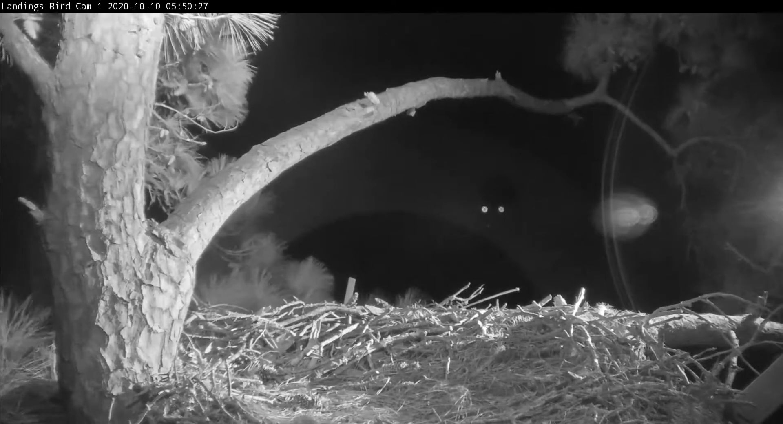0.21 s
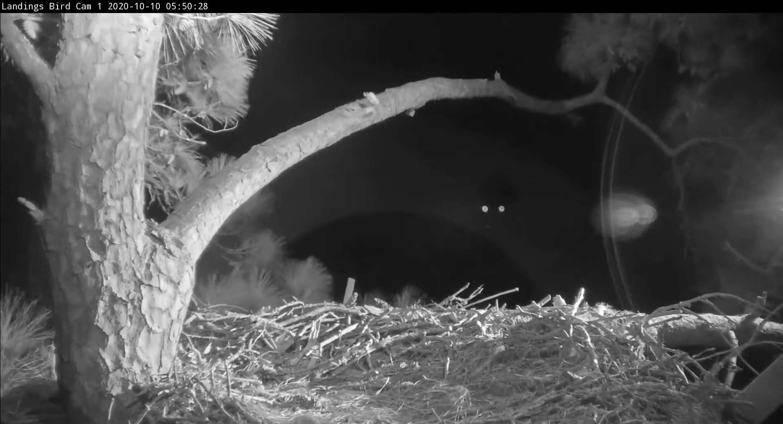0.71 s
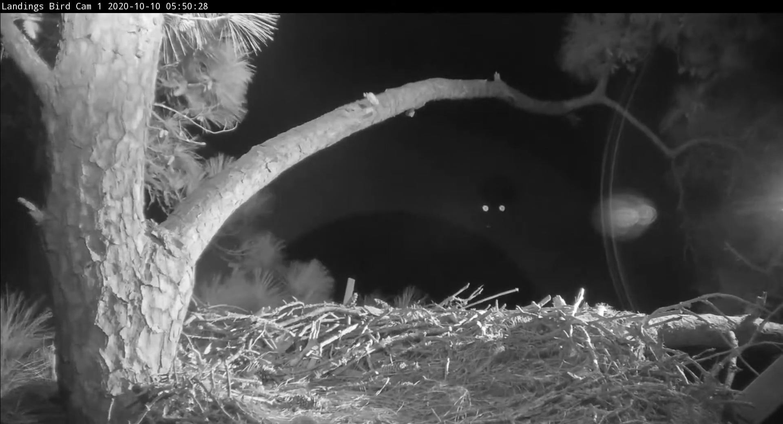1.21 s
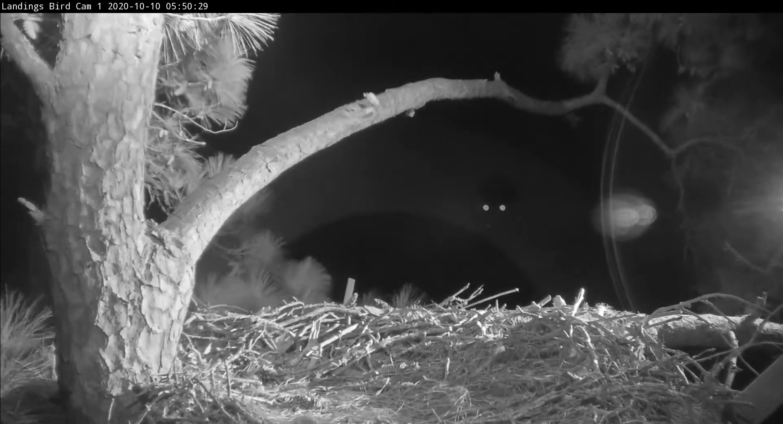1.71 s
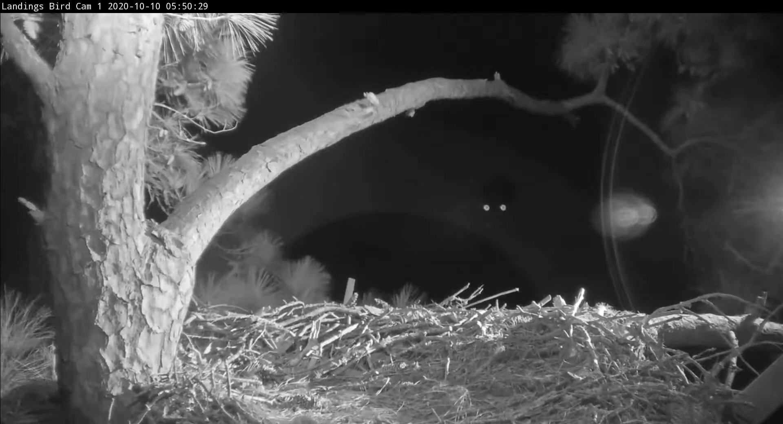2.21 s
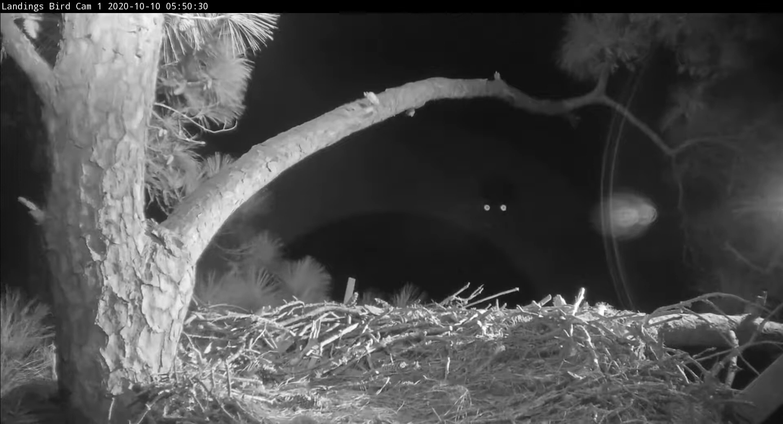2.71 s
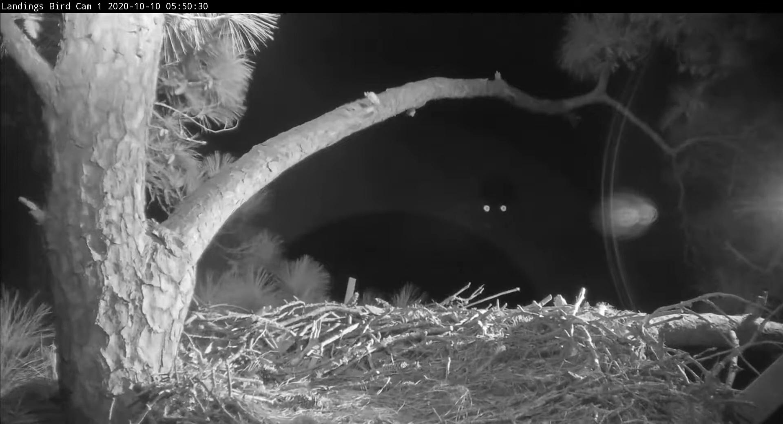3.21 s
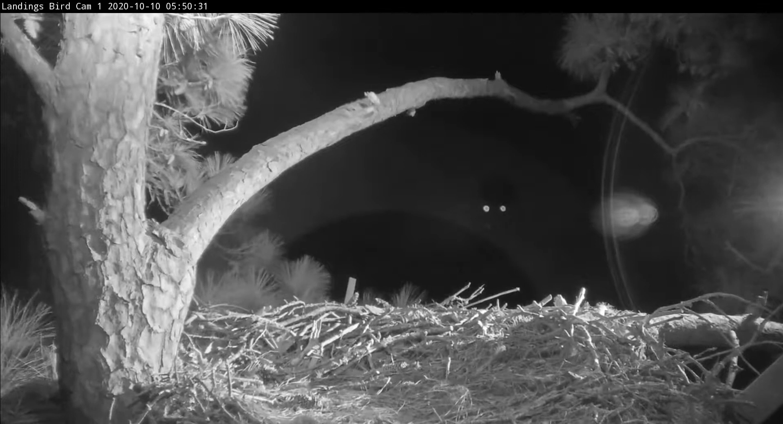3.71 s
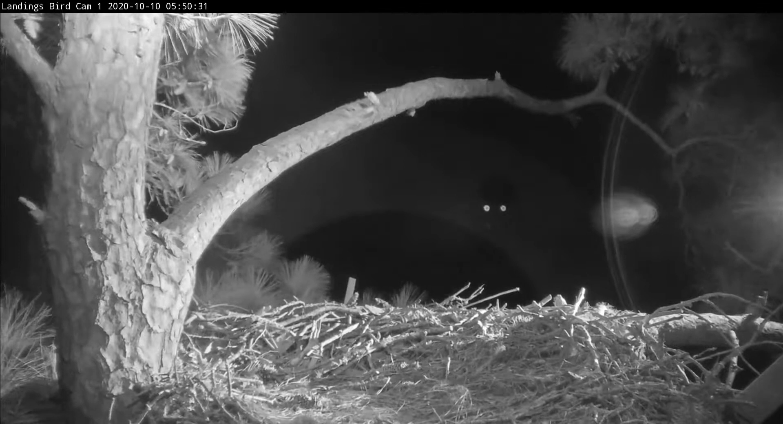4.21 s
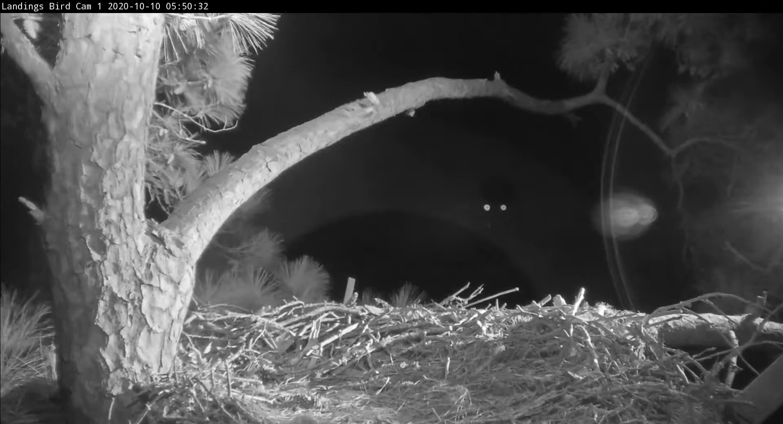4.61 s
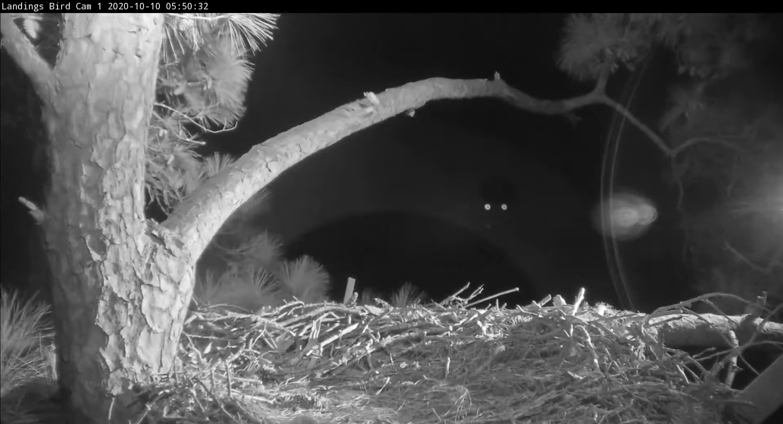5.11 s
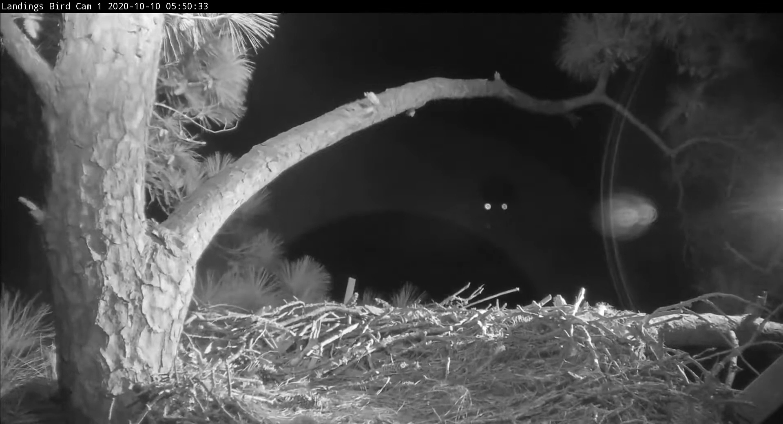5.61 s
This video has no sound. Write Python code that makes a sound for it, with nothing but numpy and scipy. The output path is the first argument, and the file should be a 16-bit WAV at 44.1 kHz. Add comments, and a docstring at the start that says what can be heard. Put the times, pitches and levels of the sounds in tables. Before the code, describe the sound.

Steady cricket trill and rumbling night breeze, opened by a clipped harsh owl screech and closed by a short whine, squeal and grunt.

```python
"""Night at a nest high in a pine, heard by a fixed outdoor camera's microphone.
First an owl ends a harsh screech in two pushes of breath and a faint whimper: syrinx harmonics plus rough air.
Near five seconds its whine scoops up and wavers, cracks into a hoarse squeal, then a grunt and a puff of hiss.
Throughout, tree crickets trill in sagging wing strokes, shaped noise makes breeze, air and far insects' fizz,
and wavering sines make the mains hum."""
import sys
import numpy as np
from scipy import signal
from scipy.fft import rfft, irfft
from scipy.io import wavfile
from scipy.ndimage import uniform_filter1d

SR = 44100
rng = np.random.default_rng(int(sys.argv[2]) if len(sys.argv) > 2 else 0)


def wav_out(sig):
    """Save sig, one row per channel (or a flat mono array), as 16-bit PCM at SR to the path in sys.argv[1]."""
    wavfile.write(sys.argv[1], SR, np.round(np.clip(np.atleast_2d(sig).T, -1, 1) * 32767).astype(np.int16))


N = 257544
TIME = np.arange(N) / SR
EDGE_HZ = 7250  # top of the audible band

# breath pushes of the screech: peak t/s, level/dB, roughness (0-1)
SCREECH_PUSHES = [(.001, -23.6, .22), (.027, -18.8, .33)]
PUSH_RISE_S, PUSH_FADE_DB_PER_S = .004, 570
# the screech's pitch collapses once, and the beak shuts with it
SCREECH_TOP_HZ, SCREECH_END_HZ, COLLAPSE_AT_S, COLLAPSE_S = 870, 470, .0375, .016
# shape of each later call, before its own swells and fades: start t/s, attack t/s, hold t/s, release t/s, level/dB
WHIMPER_SHAPE = (.055, .015, .06, .03, -53)
WHINE_SHAPE = (4.968, .04, .212, .017, -38.8)
SQUEAL_SHAPE = (5.23, .007, .1, .045, -39.6)
GRUNT_SHAPE = (5.356, .012, .01, .016, -44.5)
HISS_SHAPE = (5.455, .025, .002, .022, -48)
WHIMPER_HZ = 443
# pitch of the whine as it scoops up, sags and lifts to the crack: t/s, f/Hz
WHINE_GLIDE = [(4.975, 368), (5.0, 412), (5.025, 444), (5.068, 463.5), (5.095, 454), (5.13, 442.5),
               (5.195, 451), (5.218, 474), (5.235, 516)]
WHINE_FADE_DB_PER_S = 13
# squeal and grunt start on a pitch and sag from it
SQUEAL_HZ, SQUEAL_SAG_HZ_PER_S, SQUEAL_FADE_DB_PER_S = 2720, 2500, 40
GRUNT_HZ, GRUNT_SAG_HZ_PER_S = 410, 1100
# throat colour of the screech: f/Hz, relative level/dB
SCREECH_COLOUR = [(300, -30), (850, -17), (1200, -6), (1700, -8), (2300, 3.5), (3050, 4.5), (3500, -1),
                  (3800, -11), (4400, -13), (5150, -8), (5500, -20), (6000, -21), (7200, -36)]
# throat colour of the squeal: f/Hz, relative level/dB
SQUEAL_COLOUR = [(500, -30), (1300, -12), (2100, -17), (2550, -2), (3300, 0), (4300, -1), (4600, -5),
                 (5000, -2), (5400, -1.5), (5700, -14), (6500, -27), (7200, -35.5)]
# throat colour of the grunt: f/Hz, relative level/dB
GRUNT_COLOUR = [(200, -29), (400, -6.5), (750, -12), (1170, 2), (1600, -16), (4000, -13), (7000, -27)]
# throat resonances of the whine: f/Hz, half-width f/Hz, relative level/dB
WHINE_RESONANCES = [(450, 260, -1.5), (930, 170, 2.5), (1170, 60, 8), (1425, 90, 5), (1780, 170, -3.5),
                    (2260, 150, -10.5), (3220, 130, -1), (4000, 75, -3), (4540, 130, -3), (5400, 110, -6)]

CRICKET_HZ, CHORUS_REACH_HZ, NEAR_DETUNE_HZ = 2951, 164, 41
# wing strokes of a nearer cricket, before its trim: t/s, peak level/dB
NEAR_WING_STROKES = [(.406, -36), (.584, -35), (1.032, -35), (1.076, -33.5), (1.521, -37), (2.051, -35),
                     (2.125, -32), (2.777, -35), (3.166, -33), (3.259, -33), (3.567, -35.5), (4.184, -35),
                     (4.53, -35), (4.62, -34), (4.8, -32.5), (4.883, -34), (5.436, -35.5)]
# cricket chorus, before its swells: t/s, level/dB
CHORUS_LEVEL = [(.1, -45), (.18, -48.5), (.33, -45.8), (1.45, -46.3), (1.88, -44.8), (2.05, -42.2),
                (2.22, -45.8), (2.42, -43.3), (2.6, -44.8), (2.78, -42), (3.28, -41.6), (3.5, -43.4),
                (4.85, -42.3), (5.35, -46), (5.76, -42.8)]

# breeze at the microphone, before its trim: t/s, level/dB
BREEZE_STRENGTH = [(0, -41), (.2, -43), (.38, -39), (.57, -44), (.76, -37), (1.02, -44), (1.33, -40),
                   (1.46, -53), (1.73, -47), (1.9, -53), (2.3, -43), (2.58, -45), (2.78, -56), (3.0, -47.5),
                   (3.45, -51), (3.78, -47), (3.96, -52), (4.15, -41.5), (4.55, -54), (4.96, -44.5),
                   (5.3, -65), (5.82, -47)]
# eddies that swell the rumble, before their trim: t/s, peak level/dB
EDDY_PEAKS = [(.16, -35), (.252, -34), (.344, -35), (.404, -34), (.704, -34), (.77, -33), (.824, -33),
              (.871, -37), (.918, -36), (.963, -36), (1.104, -34), (1.252, -35), (1.279, -32.5),
              (1.341, -34), (1.388, -31), (1.495, -36.5), (1.585, -35), (1.676, -33), (1.78, -41),
              (2.194, -30.5), (2.306, -34.5), (2.342, -34.5), (2.391, -35), (2.462, -37), (2.548, -33.5),
              (3.012, -42), (3.285, -42), (3.65, -43), (3.784, -39.5), (4.13, -37.5), (4.163, -41),
              (4.24, -40.5), (4.775, -41.5)]
# colour of the breeze's rumble: f/Hz, relative level/dB
RUMBLE_COLOUR = [(50, -45), (75, -18), (105, -12), (145, 2), (185, 0), (240, -8.5), (320, -14), (450, -22),
                 (650, -36), (1200, -38), (2500, -55)]
# colour of the brighter fringe of hard gusts: f/Hz, relative level/dB
FRINGE_COLOUR = [(150, -20), (300, 0), (450, -2), (650, -13), (1200, -14), (2500, -32)]

# far insects' fizz, before its flutter: t/s, level/dB
FIZZ_LEVEL = [(.1, -61.5), (.35, -58), (.8, -60.5), (1.4, -58.5), (2.03, -52.7), (2.25, -56.5),
              (2.7, -54.2), (4.95, -52.9), (5.15, -57.3), (5.45, -57.3), (5.78, -53.7)]
# colour of the fizz: f/Hz, relative level/dB
FIZZ_TINT = [(2200, -27.5), (2700, 1.5), (3300, 8), (3900, 4.5), (4500, 1), (5100, -5), (5600, -1),
             (6050, 5), (6400, 2), (6750, 4.5), (6950, -12.5), (7400, -9.5)]
# colour of the night air: f/Hz, relative level/dB
AIR_COLOUR = [(30, -33.5), (60, -23), (110, 9), (200, 6), (330, 0.5), (520, -5.5), (700, -5.5), (950, 0),
              (1200, 7.5), (1500, 3.5), (2000, 0.5), (2600, -4), (4000, -7.5), (7000, -28.5)]
AIR_DB = -50  # centre of its swells
# steady machine tones, before waver and motor trim: f/Hz, level/dB
HUM_TONES = [(59.6, -83), (119.3, -50), (179, -60.5), (473, -72), (822, -68), (1165, -67.5), (2347, -81.5)]
# two motors slightly out of step: length of one beat, and a moment in step
BEAT_S, IN_STEP_S = .38, 3.15


def owl(start, hz, gain, rough, throat, beak_db=0, even_db=0, jitter=.03, rasp=.3, rasp_hz=250, beak_hz=3600):
    """Syrinx harmonics and rough air pass the throat; roughness shakes the pitch and the level."""
    size, rough = len(hz), np.clip(rough, 0, 1)
    shaken_hz = hz * (1 + jitter * rough * drift(rasp_hz, size))
    turns = np.cumsum(shaken_hz) / SR
    k = np.arange(1, 15)[:, None]  # harmonic numbers
    # a membrane that swings evenly weakens the even harmonics; an open beak lets the high ones out
    above_beak = (1 + np.tanh((k * hz - beak_hz) / 200)) / 2
    colour_db = even_db * (k % 2 == 0) + beak_db * above_beak
    heights = throat(k * hz) * amp(colour_db) * (k * hz < EDGE_HZ)
    waves = np.sin(2 * np.pi * (k * turns + rng.random(k.shape)))
    tone = (heights * waves).sum(0) / np.sqrt((heights ** 2).sum(0) / 2)
    puffs = 1 + np.cos(2 * np.pi * turns)  # air escapes once a cycle
    air = tint(rng.standard_normal(size) * puffs, throat)
    voice = ((1 - rough) * tone + rough * air) / np.hypot(1 - rough, rough)
    shake = 1 + rasp * rough * drift(rasp_hz, size)
    out = np.zeros(N)
    add(out, start, gain * voice * shake * signal.windows.tukey(size, .02))
    return out


def screech(rough_spent=.95, open_db=3, shut_db=-16, muffle_hz=1600, muffled_db=1.5):
    """Two hard pushes, the second rougher; pitch collapses, the beak shuts, and the voice turns to air."""
    t = TIME[:SR // 10]
    pushes = []
    for s, db, _ in SCREECH_PUSHES:
        rise = np.exp(np.minimum(t - s, 0) / PUSH_RISE_S)
        pushes.append(rise * amp(db - PUSH_FADE_DB_PER_S * np.maximum(t - s, 0)))
    gain = np.max(pushes, axis=0)
    slack = (1 + np.tanh((TIME - COLLAPSE_AT_S) / COLLAPSE_S)) / 2
    call_slack = slack[:len(t)]
    hz = SCREECH_TOP_HZ + (SCREECH_END_HZ - SCREECH_TOP_HZ) * call_slack
    peaks, _, roughs = np.transpose(SCREECH_PUSHES)
    rough = np.interp(t, [*peaks, t[-1]], [*roughs, rough_spent])
    beak_db = open_db + (shut_db - open_db) * call_slack
    voice = owl(0, hz, gain, rough, spectrum(SCREECH_COLOUR), beak_db=beak_db, jitter=.09, rasp=.5, rasp_hz=450)
    lowpass = signal.butter(1, muffle_hz, fs=SR, output="sos")
    muffled = amp(muffled_db) * signal.sosfiltfilt(lowpass, voice)
    return (1 - slack ** 2) * voice + 2 * slack ** 2 * muffled


def whimper():
    """The screech trails off in a faint thin note on one pitch, through one throat resonance."""
    t, gain = call(*WHIMPER_SHAPE)
    throat = resonances([(1330, 120, 0)])
    return owl(WHIMPER_SHAPE[0], np.full(len(t), WHIMPER_HZ), gain, rough=.05, throat=throat)


def whine(rough_start=.45, rough_held=.04, clears_s=.055, shut_db=-14, opens_s=.07,
          strain_db=3, strain_s=.035, even_db=-10.5, uneven_db=3):
    """A breathy start clears as the beak opens, then strains; even harmonics come up at both ends."""
    t, gain = call(*WHINE_SHAPE)
    hz = np.interp(WHINE_SHAPE[0] + t, *np.transpose(WHINE_GLIDE))
    unsettled = np.exp(-(t / clears_s) ** 2)
    strain = np.exp(-((t[-1] - t) / strain_s) ** 2)
    gain = gain * amp(strain_db * strain - WHINE_FADE_DB_PER_S * t)
    rough = rough_held + rough_start * unsettled
    return owl(WHINE_SHAPE[0], hz, gain, rough, resonances(WHINE_RESONANCES),
               beak_db=shut_db * np.exp(-(t / opens_s) ** 2),
               even_db=even_db + uneven_db * (unsettled + strain), jitter=.044, rasp=.15)


def squeal(frays_s=.06, frayed_start=.35, high_db=-1.3, low_db=0, open_db=4.5, shuts_db_per_s=60, order=5):
    """The voice cracks up to its fifth harmonic, sags, and frays back into a gritty buzz on the low pitch."""
    t, gain = call(*SQUEAL_SHAPE)
    gain = gain * amp(-SQUEAL_FADE_DB_PER_S * t)
    hz = SQUEAL_HZ - SQUEAL_SAG_HZ_PER_S * t
    clear = (1 - np.clip(frayed_start, 0, 1)) * np.exp(-t / frays_s)
    throat = spectrum(SQUEAL_COLOUR)
    high = owl(SQUEAL_SHAPE[0], hz, gain * amp(high_db) * np.sqrt(clear), rough=.2, throat=throat,
               beak_db=open_db - shuts_db_per_s * t, jitter=.035, rasp=.5)
    low = owl(SQUEAL_SHAPE[0], hz / order, gain * amp(low_db) * np.sqrt(1 - clear), rough=.56, throat=throat,
              jitter=.035, rasp=.55, rasp_hz=450)
    return high + low


def grunt():
    """A short rough voice, falling in pitch, closes the call."""
    t, gain = call(*GRUNT_SHAPE)
    hz = GRUNT_HZ - GRUNT_SAG_HZ_PER_S * t
    return owl(GRUNT_SHAPE[0], hz, gain, rough=.28, throat=spectrum(GRUNT_COLOUR), jitter=.044, rasp=.41)


def hiss():
    """A faint puff of noise through one resonance after the call."""
    t, gain = call(*HISS_SHAPE)
    out = np.zeros(N)
    add(out, HISS_SHAPE[0], gain * noise(resonances([(1850, 260, 0)]), len(t)))
    return out


def trees(x, t60):
    """Trunks and needles scatter a sound into a thin dying tail of sparse echoes."""
    t = np.arange(SR // 2) / SR
    sparse = rng.random(len(t)) < 2000 / SR  # about 2000 echoes per second
    taps = rng.standard_normal(len(t)) * sparse * (t > .006) * amp(-60 * t / t60)
    return signal.fftconvolve(x, taps / np.linalg.norm(taps))[:len(x)]


def near_cricket(trim_db=-1.5, stroke_s=.014, sag_hz=120, wet_db=-11):
    """Now and then one sagging wing stroke of a nearer cricket stands out of the chorus."""
    out, t = np.zeros(N), np.arange(0, stroke_s, 1 / SR)
    swell = np.sin(np.pi * t / stroke_s) ** 2
    detunes = rng.standard_normal(len(NEAR_WING_STROKES))
    for (s, db), detune in zip(NEAR_WING_STROKES, detunes):
        hz = CRICKET_HZ + NEAR_DETUNE_HZ * detune + sag_hz * (.5 - t / stroke_s)
        stroke = swell * np.sin(2 * np.pi * np.cumsum(hz) / SR)
        add(out, s - stroke_s / 2, amp(db + trim_db) * stroke)
    return out + amp(wet_db) * trees(out, t60=.2)


def crickets(count=14, strokes_per_s=56, sag_hz=125, spread_db=1, edge_db=15, wet_db=-1,
             gain_db=0, swell_db=.3, fading_db=1.3, slip=.7):
    """Each cricket scrapes its wings in an uneven trill; the note sags within every stroke."""
    out = np.zeros(N)
    places = np.linspace(-1, 1, count)
    for place, (speed, start, near) in zip(places, rng.uniform(-1, 1, (count, 3))):
        wander = drift(10)
        rate = strokes_per_s * (1 + .3 * speed + .08 * wander)
        strokes = 1 + start + np.cumsum(rate) / SR
        within = strokes % 1
        hz = CRICKET_HZ + CHORUS_REACH_HZ * place + 25 * wander + sag_hz * (.5 - within)
        # the wing's ringing slips a little from stroke to stroke
        fresh = slip * rng.random(SR)[strokes.astype(int)]
        song = np.sin(np.pi * within) ** 4 * np.sin(2 * np.pi * (np.cumsum(hz) / SR + fresh))
        # those near the common pitch are loudest, and each comes and goes
        loudness = amp(spread_db * near - edge_db * place ** 2 + fading_db * drift(9))
        # each by its own path through the trees
        out += loudness * (song + amp(wet_db) * trees(song, t60=0.27))
    return amp(gain_db + swell_db * drift(8)) * level(CHORUS_LEVEL) * unit(out)


def breeze(trim_db=-2.6, eddy_trim_db=-2.8, eddy_s=.01, flutter_db=1.7, flutter_hz=60, evenness=.7,
           fringe_db=-16.5, fringe_growth=.8, low_edge_hz=72):
    """A ragged rumble swells with each eddy; the harder the air hits, the more bright fringe it has."""
    eddy_power = np.zeros(N)
    for s, db in EDDY_PEAKS:
        bump = np.exp(-((TIME - s) / eddy_s) ** 2 / 2)
        eddy_power += (amp(db + eddy_trim_db) * bump) ** 2
    strength = np.sqrt((amp(trim_db) * level(BREEZE_STRENGTH)) ** 2 + eddy_power)
    rumble = noise(spectrum(RUMBLE_COLOUR))
    power = abs(uniform_filter1d(rumble ** 2, size=900)) + 1e-6
    rumble = unit(rumble / power ** (evenness / 2))  # the flow never lets up entirely
    growth = (strength / strength.max()) ** fringe_growth
    fringe = amp(fringe_db) * growth * noise(spectrum(FRINGE_COLOUR))
    gusts = strength * (rumble + fringe) * unit(amp(flutter_db * drift(flutter_hz)))
    highpass = signal.butter(2, low_edge_hz, "high", fs=SR, output="sos")
    return signal.sosfiltfilt(highpass, gusts)


def night(flutter_db=1.1, swell_db=1.0):
    """Distant air and the fizz of far insects, both shaped noise with a wavering level."""
    air = amp(AIR_DB + swell_db * drift(19)) * noise(spectrum(AIR_COLOUR))
    fizz = level(FIZZ_LEVEL) * amp(flutter_db * drift(60)) * noise(spectrum(FIZZ_TINT))
    return air + fizz


def hum(waver=0.0022, waver_db=1.3, motor_trim_db=-1.8, second_motor=.3, motor_top_hz=150):
    """Mains hum and faint machine tones, wavering a little; the low hum beats between two motors."""
    beat = abs(1 + second_motor * np.exp(2j * np.pi * (TIME - IN_STEP_S) / BEAT_S))
    tones = np.zeros(N)
    for hz, db in HUM_TONES:
        throb = amp(motor_trim_db) * beat if hz < motor_top_hz else 1
        wave = np.sin(2 * np.pi * np.cumsum(hz * (1 + waver * drift(5.5))) / SR)
        tones += amp(db + waver_db * drift(12)) * throb * wave
    return np.sqrt(2) * tones  # levels are rms


def amp(db):
    """Decibels to gain."""
    return 10 ** (np.asarray(db) / 20)


def unit(x):
    """Scales to rms 1."""
    return x / np.sqrt(np.mean(x ** 2) + 1e-20)


def level(rows):
    """A curve of (t/s, level/dB) as a gain for every sample."""
    return amp(np.interp(TIME, *np.transpose(rows)))


def call(start, attack, hold, release, db):
    """The clock of one call, and its gain: attack, hold, release."""
    t = np.arange(0, attack + hold + release, 1 / SR)
    corners = [0, attack, attack + hold, attack + hold + release]
    return t, amp(db) * np.interp(t, corners, [0, 1, 1, 0])


def spectrum(points):
    """Gain against frequency from (f/Hz, level/dB) points, joined on a log frequency axis."""
    f, db = np.transpose(points)
    return lambda hz: amp(np.interp(np.log(hz + 1), np.log(f), db))


def resonances(modes):
    """Gain against frequency from (f/Hz, half-width f/Hz, level/dB) peaks, summed in power."""
    return lambda hz: np.sqrt(sum((amp(db) / (1 + ((hz - f) / width) ** 2)) ** 2 for f, width, db in modes))


def tint(x, colour):
    """Gives a sound a gain against frequency, and rms 1."""
    return unit(irfft(rfft(x) * colour(np.fft.rfftfreq(len(x), 1 / SR)), len(x)))


def noise(colour, size=N):
    """Noise of rms 1 with the given gain against frequency."""
    return tint(rng.standard_normal(size), colour)


def drift(hz, size=N):
    """Slow chance of rms 1 around zero, its spectrum falling smoothly away by about hz."""
    return noise(lambda f: np.exp(-(f / hz) ** 2) * (f > 0), size)


def add(mix, s, sound):
    """Lays a sound into the mix at time s."""
    part = mix[max(round(s * SR), 0):][:len(sound)]
    part += sound[:len(part)]


def scene(wet_db=-21):
    """The owl among the trees, over insects, breeze and hum."""
    calls = screech() + whimper() + whine() + squeal() + grunt() + hiss()
    owl_in_trees = calls + amp(wet_db) * trees(calls, t60=0.43)
    insects = near_cricket() + crickets()
    return (owl_in_trees + insects + breeze() + night() + hum())[None]


def record(dry, low_cut_hz=58):
    """The camera's narrow band: no deep bass, no high treble."""
    highpass = signal.butter(N=3, Wn=low_cut_hz, btype="high", fs=SR, output="sos")
    thin = signal.sosfilt(highpass, dry)
    lowpass = signal.firwin(401, EDGE_HZ, window=("kaiser", 8), fs=SR)
    return signal.oaconvolve(thin, lowpass[None], "same")


dry = scene()
out = record(dry)
wav_out(out)
```